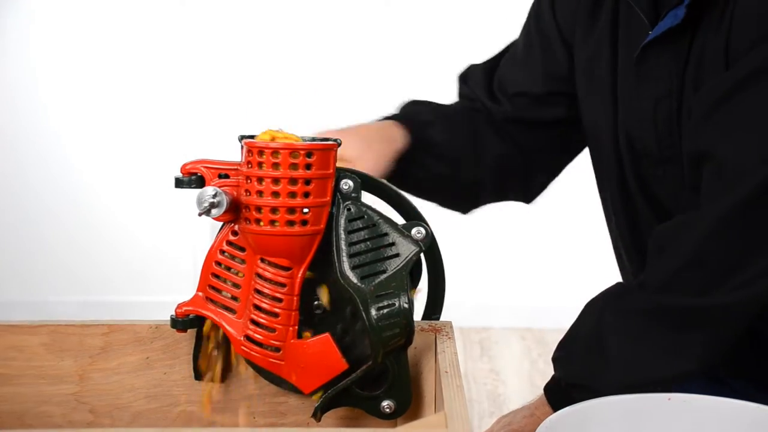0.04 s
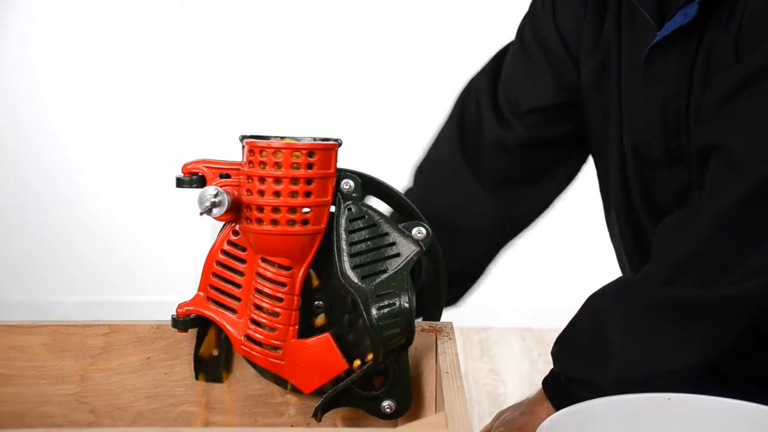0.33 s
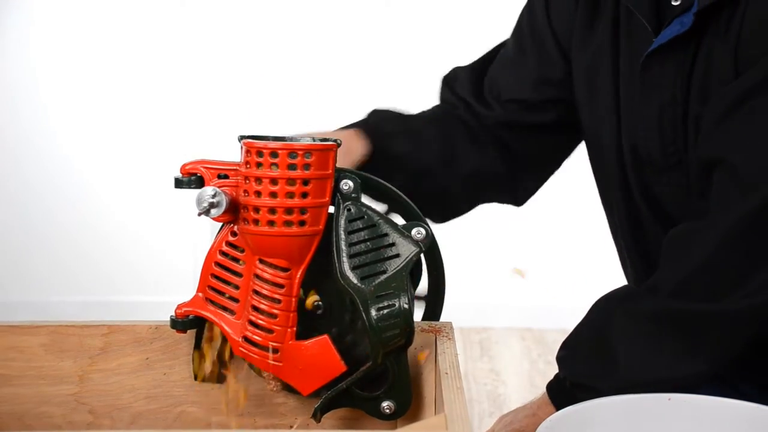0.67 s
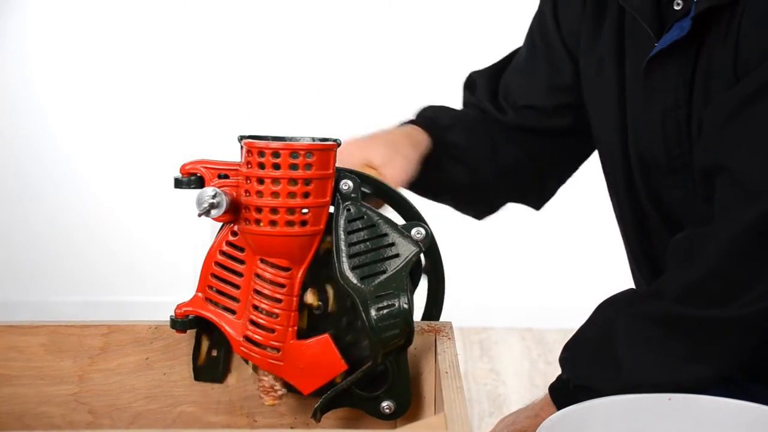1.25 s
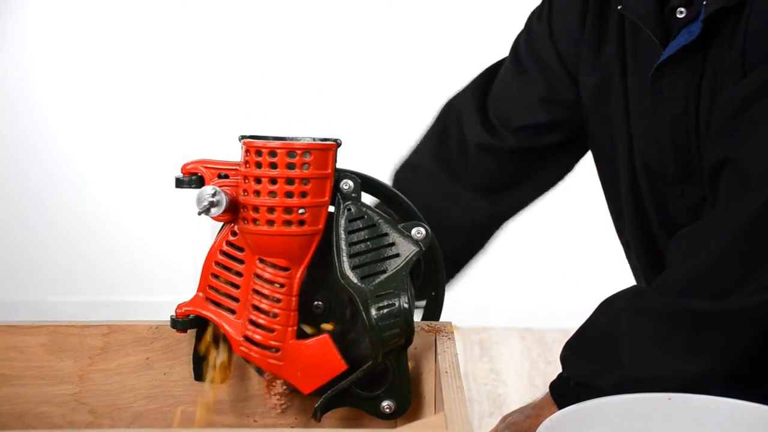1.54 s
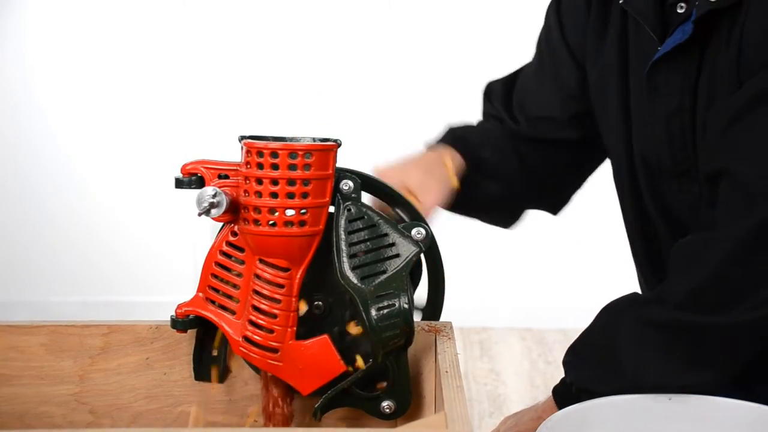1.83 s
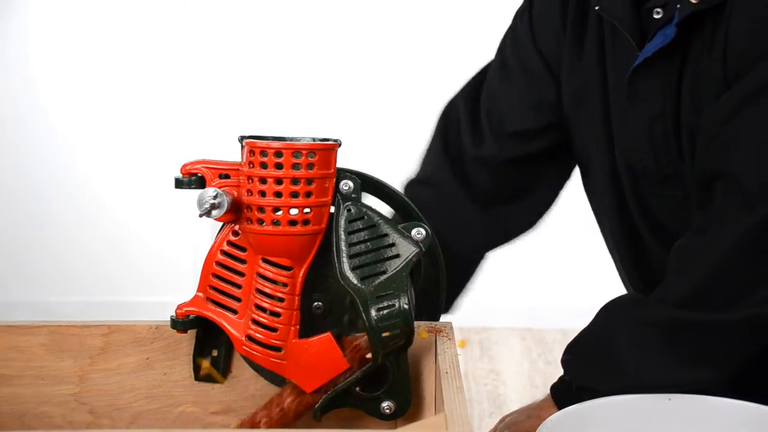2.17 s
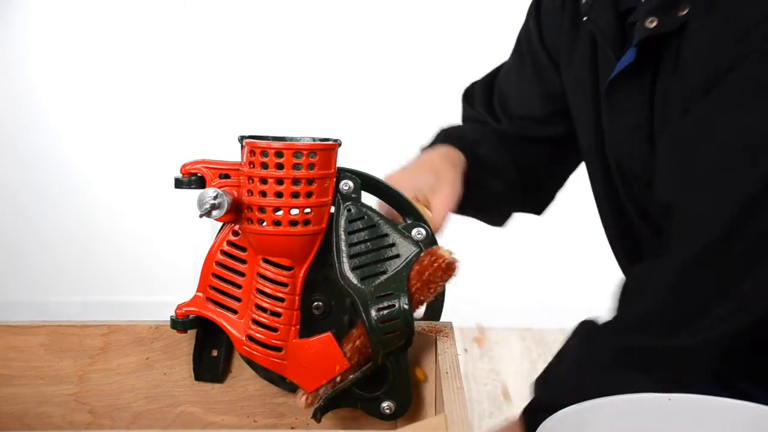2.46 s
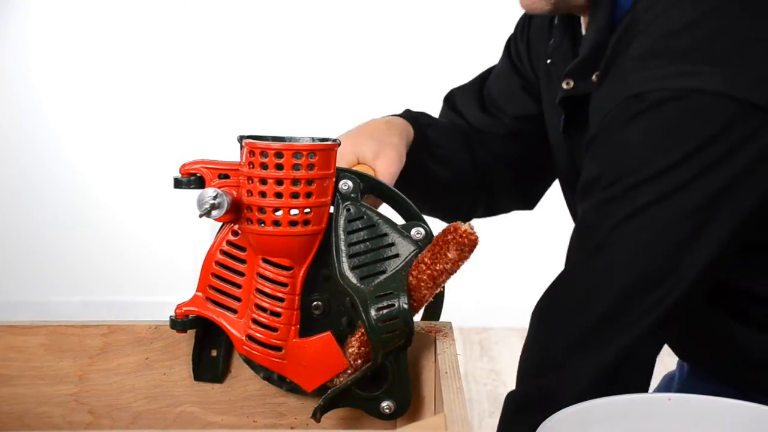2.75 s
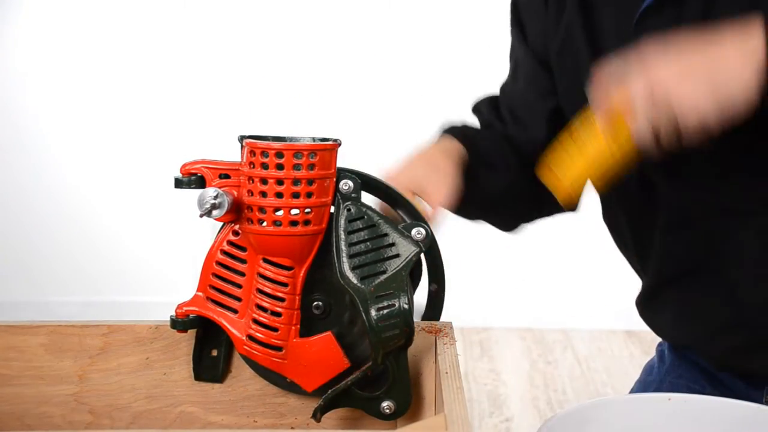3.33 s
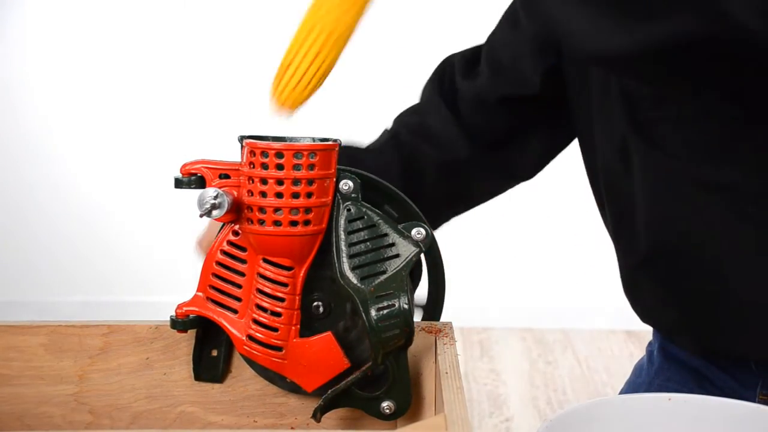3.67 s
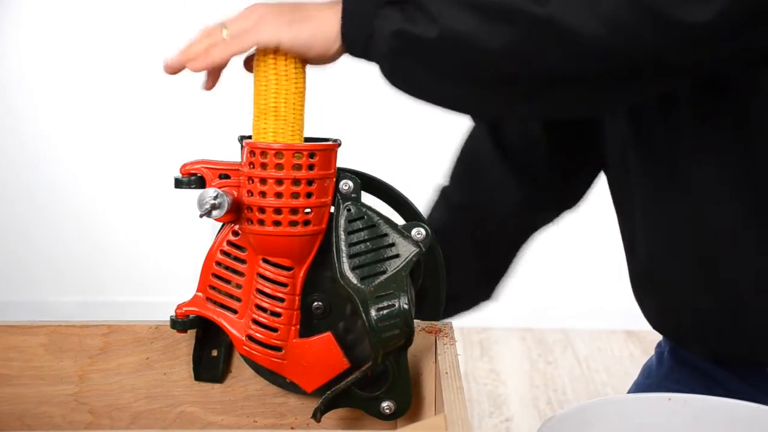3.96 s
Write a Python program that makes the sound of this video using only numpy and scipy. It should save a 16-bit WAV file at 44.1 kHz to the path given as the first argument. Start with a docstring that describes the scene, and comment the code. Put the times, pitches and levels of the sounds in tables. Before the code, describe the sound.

A hand-cranked iron corn sheller crunches through a dry cob, kernels rattling into a wooden box. The bare cob snaps and knocks its way out, stray kernels tick, and after a brief lull the crunching restarts in a bare room.

```python
"""Crunching bites and a rattle of kernels: a hand-cranked cast-iron corn sheller strips a dry cob.
Its teeth tear off kernels, whose impacts excite the modes of the iron and of the booming wooden box below.
The churning fades as the bare cob snaps, knocks and scrapes its way out and stray kernels tick.
Near the end a fresh cob is caught. A bare room reverberates over a faint steady noise."""
import sys
import numpy as np
from scipy import signal
from scipy.fft import rfft, irfft, next_fast_len
from scipy.io import wavfile

SR = 44100
rng = np.random.default_rng(int(sys.argv[2]) if len(sys.argv) > 2 else 0)


def unload_wav(signal):
    """Save mono or channel-first audio to the path in sys.argv[1] as 16-bit WAV at rate SR, clipped to [-1, 1]."""
    wavfile.write(
        sys.argv[1],
        SR,
        np.round(np.clip(np.atleast_2d(signal).T, -1, 1) * 32767).astype(np.int16),
    )


N = 176400
T = np.arange(N) / SR

# Treble spectrum of rattling kernels and the scraping cob: (frequency [Hz], level [dB])
RATTLE_SPECTRUM = [(1200, -24.5), (2400, -5), (3300, 0.5), (5100, -1.5), (6000, -4), (7800, -6), (8550, -1),
                   (9200, -6.5), (10500, -9), (11800, -18)]


def shelling():
    """Impact excitation: showers of kernel contacts sound directly and drive the iron and the box."""
    # Spectra of the low and middle registers: (frequency [Hz], level [dB])
    rumble_spectrum = [(30, -30), (85, -35.5), (115, -1.5), (150, 1), (220, -0.5), (270, -8), (380, -7),
                       (520, -21.5), (1200, -46.5)]
    crunch_spectrum = [(150, -36.5), (330, -7), (450, 0), (650, 0.5), (880, -3.5), (1050, 0.5),
                       (1350, -2.5), (1700, -5.5), (2300, -4), (3200, -12), (7000, -38)]
    # Modes of the iron housing and wheel, and of the wooden box: (frequency [Hz], level [dB])
    iron_modes = [(2003, -42), (2089, -36.5), (2379, -34.5), (3063, -39), (3488, -36), (3817, -33.5),
                  (4021, -58), (4479, -29), (5023, -28.5), (5766, -49), (6804, -35.5), (7117, -31),
                  (8274, -46), (8543, -33), (9340, -57)]
    box_modes = [(124, -38), (150, -30), (218, -31), (300, -27), (446, -27.5), (491, -29.5), (541, -31.5),
                 (661, -31.5), (794, -29.5), (995, -31.5), (1146, -46), (1361, -34.5)]
    rumble, crunch, rattle = np.sqrt(churning_power() + bite_power()) * flutter()   # incoherent sum
    contacts = colour(rumble * grains(), rumble_spectrum)
    contacts += colour(crunch * grains(), crunch_spectrum)
    contacts += colour(rattle * grains(), RATTLE_SPECTRUM)
    iron = from_db(17.5) * ringing(rattle * flutter(), iron_modes, t60_s=0.18)
    box = from_db(13) * ringing(np.sqrt(rumble * crunch), box_modes, t60_s=0.17)
    return contacts + iron + box


def bite_power(attack_s=0.0031):
    """Exponential decay: each tooth bite is a dying surge of power in rumble, crunch and rattle."""
    # Teeth bite the cob: (time [s], level [dB], bass share [dB], treble share [dB], decay [s])
    bites = [(0.003, 0.5, -9.5, -12.5, 0.028), (0.087, -8, -18, -14, 0.028),
             (0.107, -3.5, -24, -5.5, 0.025), (0.149, -4, -30, -17, 0.028), (0.191, 10, -12, -15, 0.029),
             (0.227, 4.5, -7.5, -19, 0.031), (0.247, 0, -15, -7.5, 0.023), (0.277, 8.5, -21, -10, 0.027),
             (0.304, 9, -16, -25, 0.028), (0.334, -2.5, -5, -10, 0.028), (0.375, 10.5, -33, -13.5, 0.027),
             (0.419, -1, -24, -9, 0.028), (0.457, 4, -14, -11.5, 0.028), (0.534, 12, -21, -21, 0.028),
             (0.584, -3, -11, -4.5, 0.03), (0.694, -2.5, -18, -9, 0.028), (0.722, 2, -15, -10, 0.029),
             (0.775, 9.5, -18, -19, 0.028), (0.807, 11.5, -23, -19, 0.029),
             (0.834, 14.5, -14.5, -18.5, 0.03), (0.864, 11.5, -13, -12, 0.029),
             (0.894, 11.5, -25, -15, 0.029), (0.934, -2, -34, -9, 0.028), (0.964, -3, -28, -5, 0.027),
             (1.024, 4, -9, -10, 0.027), (1.049, -3.5, -6.5, -26, 0.023), (1.099, 7, -17, -14.5, 0.03),
             (1.141, 4.5, -9, -17, 0.027), (1.239, -8, -7, -27, 0.031), (1.26, -1, -7, -12.5, 0.027),
             (1.345, -14, -20, -1, 0.028), (1.361, 0.5, -15, -11, 0.031), (1.446, 6.5, -9, -9.5, 0.03),
             (1.479, 8.5, -20, -15.5, 0.027), (1.519, -2, -5, -3.5, 0.026), (1.562, -4, -3, -18, 0.028),
             (1.624, 5.5, -16, -12.5, 0.028), (1.657, 6.5, -18, -10, 0.026), (1.687, 7, -17, -25, 0.027),
             (1.744, -3, -21, -11, 0.028), (1.827, 7, -16.5, -13, 0.027), (1.953, -2, -18, -17, 0.027),
             (3.787, -12, -18, -12, 0.024), (3.811, -7.5, -24, 0, 0.028), (3.824, 3, -27, -14, 0.029),
             (3.899, -3, -9, -6, 0.028), (3.964, 8.5, -25, -14.5, 0.026), (3.984, -6, -15, -23, 0.028)]
    trims_db = [-3, -13.5, -5.5]   # rumble, crunch, rattle
    power = np.zeros((3, N))
    t = T[:SR // 2]
    for start, db, bass_db, treble_db, decay_s in bites:
        envelope = np.minimum(t / attack_s, 1) * np.exp(-t / decay_s)
        for register, share_db, trim_db in zip(power, (bass_db, 0, treble_db), trims_db):
            add(register, start, (from_db(db + share_db + trim_db) * envelope) ** 2)
    return power


def churning_power():
    """Overlapping contacts merge into a sustained power envelope for each of the three registers."""
    # Churning of each cob: (time [s], rumble level [dB], crunch level [dB], rattle level [dB])
    first_cob = [(0.0, -19.5, -13, -16.5), (0.38, -17, -10, -17.5), (0.55, -19.5, -14.5, -17),
                 (0.82, -16.5, -17, -17.5), (0.95, -15, -14.5, -19), (1.06, -25, -16, -26.5),
                 (1.19, -24, -27.5, -22.5), (1.37, -23.5, -18.5, -19), (1.54, -15, -10, -12),
                 (1.62, -19, -14.5, -14), (1.71, -20, -17, -14), (1.92, -27.5, -27.5, -19.5),
                 (2.02, -34, -24.5, -24), (2.2, -35, -27, -19.5), (2.36, -33, -27.5, -31.5),
                 (2.53, -43, -35.5, -27.5), (2.75, -47, -35, -33.5), (2.95, -51, -35, -39),
                 (3.18, -43, -39, -49), (3.35, -54, -45, -44), (3.54, -53, -46, -57),
                 (3.76, -51, -53.5, -59)]
    second_cob = [(3.775, -38, -47, -49), (3.789, -22, -40, -23), (3.83, -26, -33, -30),
                  (3.93, -17.5, -19.5, -17.5), (4.0, -21, -20, -24)]
    trims_db = [-1, -2.5, -2.5]
    times, *levels = np.transpose(np.vstack([first_cob, second_cob]))
    return np.array([from_db(np.interp(T, times, db) + trim) ** 2 for db, trim in zip(levels, trims_db)])


def cob_snaps(tail_decay_s=0.067):
    """A brief force has a broad spectrum: the bare cob snaps on the ejector, with a sizzling tail."""
    # Snaps: (time [s], level [dB], decay [s], relative tail level [dB])
    snaps = [(2.2523, 0, .003, -35), (2.2914, -2.5, .0035, -29), (2.3648, -6.5, 0.0029, -28),
             (2.5230, -2, .0035, -19), (2.5606, -5.5, .004, -17)]
    # Bright spectrum of a snap: (frequency [Hz], level [dB])
    spectrum = [(200, -24), (900, -13), (1600, 0), (3200, -1), (5200, -5), (6600, 2), (7500, 0.5),
                (8600, 4), (10000, -4.5), (11800, -16)]
    out = np.zeros(N)
    for start, db, decay_s, tail_db in snaps:
        snap = burst(decay_s) + from_db(tail_db) * burst(tail_decay_s)
        add(out, start, from_db(db) * colour(snap, spectrum))
    return out


def cob_knocks():
    """Damped resonance: the cob strikes frame and box, each hollow knock centred on one pitch."""
    # Knocks: (time [s], level [dB], pitch [Hz], decay [s])
    knocks = [(2.193, -22.5, 170, 0.021), (2.325, -23, 810, 0.028), (2.352, -23, 160, .02),
              (2.425, -26, 161, 0.031), (2.476, -25, 656, 0.018), (2.661, -18.5, 1360, 0.0084),
              (2.703, -31, 250, 0.019), (2.782, -26, 260, .013), (2.823, -19, 2350, 0.028),
              (2.826, -21, 1025, 0.027), (3.139, -28, 536, 0.028), (3.204, -20, 1840, 0.028),
              (3.222, -23.5, 900, 0.022), (3.224, -27, 216, 0.017), (3.306, -36, 215, 0.028)]
    # Resonance peak of a knock: (frequency [multiples of the pitch], level [dB])
    spectrum = [(.1, -33), (.5, -17.5), (.85, -4.5), (1, 1.5), (1.2, -9.5), (2, -16.5), (5, -24), (12, -53)]
    out = np.zeros(N)
    for start, db, hz, decay_s in knocks:
        knock = colour(burst(decay_s), np.array(spectrum) * [hz, 1])
        burst_energy = decay_s * SR / 2
        add(out, start, from_db(db) * knock * np.sqrt(burst_energy / np.sum(knock ** 2)))
    return out


def cob_scrapes():
    """Sliding friction: the cob rubs past the spring in short bursts of treble noise."""
    # Scrapes: (time [s], level [dB], decay [s])
    scrapes = [(2.826, -24, .05), (3.114, -33.5, .025), (3.203, -28, .045)]
    out = np.zeros(N)
    for start, db, decay_s in scrapes:
        add(out, start, from_db(db) * colour(burst(decay_s), RATTLE_SPECTRUM))
    return out


def stray_kernels(trim_db=-6.5, decay_s=0.0016):
    """Hard impacts are brief: single kernels land as dry ticks."""
    # Landings: (time [s], level [dB], spectral tilt [dB/octave])
    ticks = [(2.025, -6.5, -1), (2.0793, -1.5, 0.0), (2.129, -4, -2.5), (2.139, -3, 11), (2.1665, -2, 2.5),
             (2.2424, -8, 2), (2.2622, -3.5, -4), (2.4254, -9, 5), (2.5047, -3, -0.5), (2.6269, -4.5, 0.5),
             (2.6614, -12, 3), (2.7064, -10, -2), (2.7334, -12.5, -4), (2.8047, -6.5, 3.5),
             (2.8455, -4, 1.5), (2.9085, -12.5, -1), (2.9427, -8.5, 4.5), (3.032, -11.5, -10.5),
             (3.0762, -18, -5), (3.1139, -11, -2), (3.1237, -20, -5), (3.1572, -17, -2),
             (3.2577, -11, -4.5), (3.3418, -11.5, -4), (3.4037, -17.5, -11.5), (3.5059, -19.5, -5),
             (3.5364, -30, -7), (3.5525, -27, -7), (3.716, -29.5, -5)]
    # Spectrum of a tick: (frequency [Hz], level [dB])
    spectrum = [(300, -24), (1200, -2), (2500, 4.5), (4000, -2.5), (6000, -5), (8500, -6), (11800, -21)]
    out = np.zeros(N)
    for start, db, tilt_db in ticks:
        add(out, start, from_db(db + trim_db) * colour(burst(decay_s, size=2048), spectrum, tilt_db))
    return out


def room(x, t60_s=0.48, gap_s=0.00498):
    """Reverberation: convolution with a bare room's diffuse, exponentially decaying reflections."""
    tail = rng.standard_normal(SR) * from_db(-60 * T[:SR] / t60_s) * (T[:SR] > gap_s)
    return signal.fftconvolve(x, tail / np.sqrt(np.sum(tail ** 2)))[:N]


def background():
    """Stationary filtered noise, strongest near 470 Hz."""
    # (frequency [Hz], level [dB])
    spectrum = [(30, -28), (60, -3), (160, -4), (330, -8), (470, 8), (600, -21), (3000, -14), (11700, -38)]
    return colour(rng.standard_normal(N), spectrum)


def ringing(force, modes, t60_s):
    """Modal superposition: each mode is a damped oscillator struck by its own share of the contacts."""
    out, radius = 0, from_db(-60 / (t60_s * SR))
    for hz, db in modes:
        angle = 2 * np.pi * hz / SR
        feedback = [1, -2 * radius * np.cos(angle), radius ** 2]
        out += from_db(db) * signal.lfilter([np.sin(angle)], feedback, force * grains())
    return out * np.sqrt(2 * (1 - radius ** 2))


def grains(contacts_per_s=5000, spread_db=3):
    """Shot noise: dense tiny contacts of uneven strength, at unit rms."""
    strength = from_db(spread_db * np.minimum(rng.exponential(1, N), 4)) * rng.choice([-1, 1], N)
    return rms_one(strength * (rng.random(N) < contacts_per_s / SR))


def flutter(depth_db=2, swings_per_s=45):
    """Random amplitude modulation: the level flickers quickly."""
    knots = np.arange(0, N / SR + 1, 1 / swings_per_s)
    return from_db(depth_db * np.interp(T, knots, rng.standard_normal(N)[:len(knots)]))


def burst(decay_s, size=16384):
    """Exponentially damped noise: the dying crackle of one contact."""
    return rng.standard_normal(size) * np.exp(-T[:size] / decay_s)


def colour(x, spectrum, tilt_db=0):
    """Minimum-phase filter of unit power along (frequency [Hz], level [dB]) points, tilted per octave."""
    size = next_fast_len(len(x) + 4096)
    size += size % 2
    octave = np.log2(np.maximum(np.fft.rfftfreq(size, 1 / SR), 1))
    hz, db = np.transpose(spectrum)
    slope_db = tilt_db * np.clip(octave, np.log2(hz[0]), np.log2(hz[-1]))
    gain = rms_one(from_db(np.interp(octave, np.log2(hz), db) + slope_db))
    cepstrum = irfft(np.log(gain))
    cepstrum[1:size // 2] *= 2   # folding the cepstrum makes the filter causal
    cepstrum[size // 2 + 1:] = 0
    return irfft(rfft(x, size) * np.exp(rfft(cepstrum)))[:len(x)]


def from_db(db):
    """Decibels to amplitude ratio."""
    return 10 ** (np.asarray(db) / 20)


def rms_one(x):
    """Normalisation to unit rms."""
    return x / np.sqrt(np.mean(x ** 2) + 1e-20)


def add(out, start_s, sound):
    """Superpose a sound from a given time on."""
    start = max(int(start_s * SR), 0)
    out[start:start + len(sound)] += sound[:N - start]


def scene():
    """Superposition of machine, room and background, the same in both ears."""
    machine = shelling() + cob_snaps() + cob_knocks() + cob_scrapes() + stray_kernels()
    mono = machine + from_db(-11) * room(machine) + from_db(-51.5) * background()
    return np.array([mono, mono])


def record(dry, knee=4.6, cutoff_hz=11900):
    """Filtering and saturation: the microphone notches the treble, rounds loud peaks and cuts the top."""
    # Dips in the microphone's response: (frequency [Hz], width [Hz], depth [dB])
    dips = [(5870, 450, 6.5), (7000, 90, 14)]
    for hz, width_hz, depth_db in dips:
        band = signal.lfilter(*signal.iirpeak(hz, hz / width_hz, fs=SR), dry)
        dry = dry - (1 - from_db(-depth_db)) * band
    clipped = dry / (1 + np.abs(dry) ** knee) ** (1 / knee)
    return signal.sosfilt(signal.ellip(10, .2, 70, cutoff_hz, fs=SR, output="sos"), clipped)


dry = scene()
out = record(dry)
unload_wav(out)
```